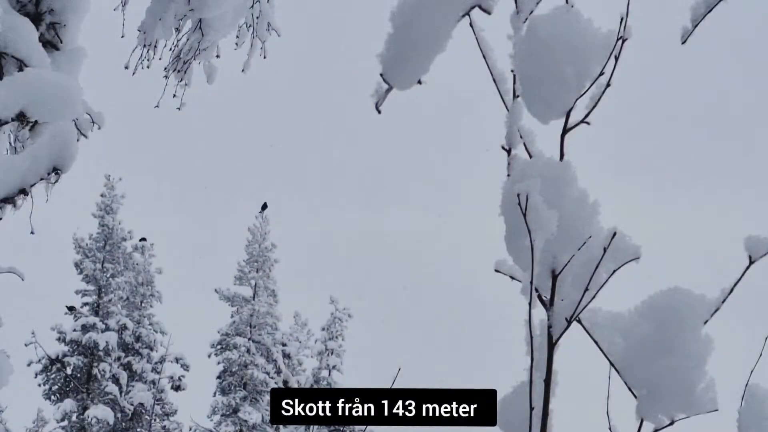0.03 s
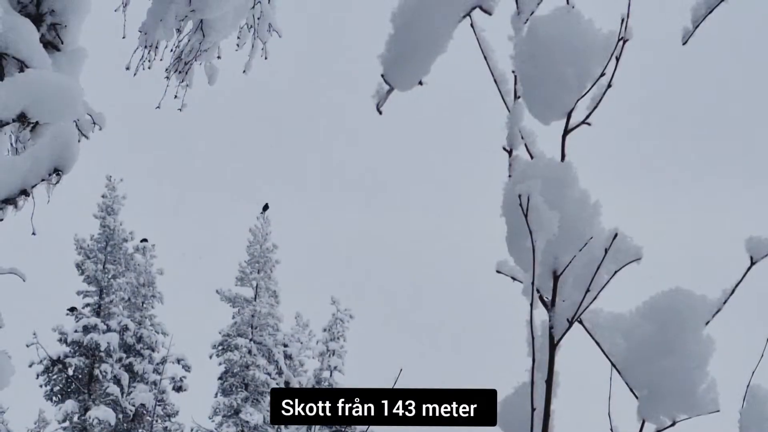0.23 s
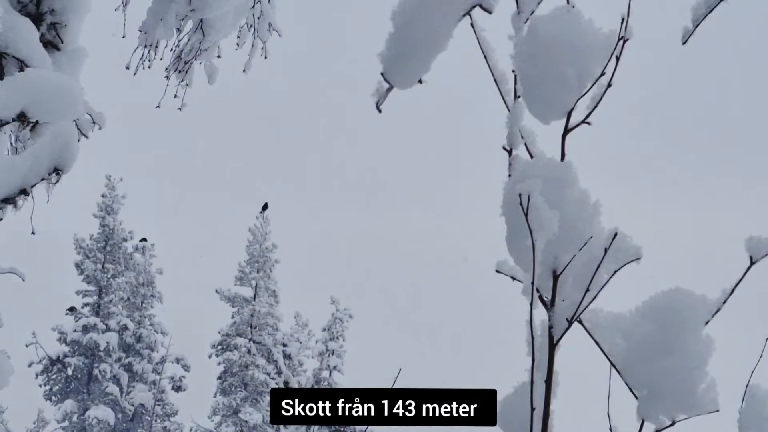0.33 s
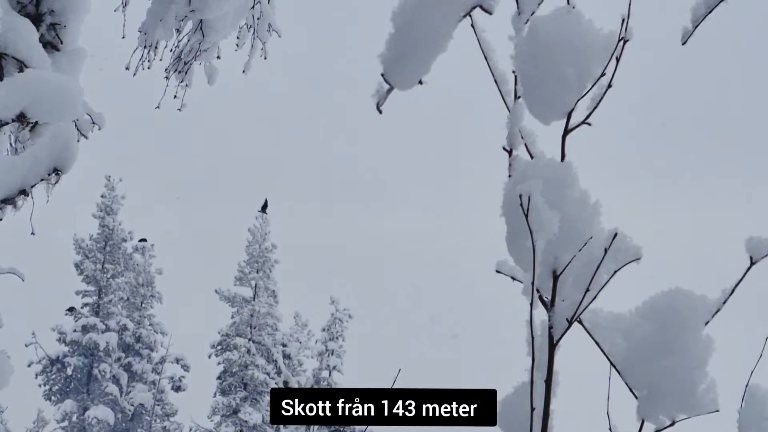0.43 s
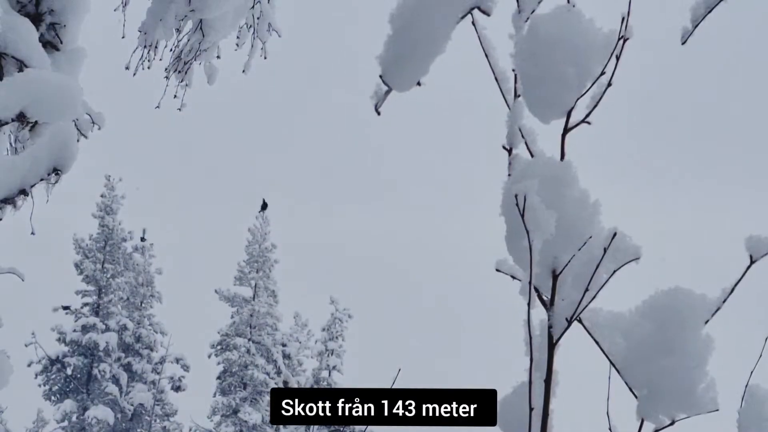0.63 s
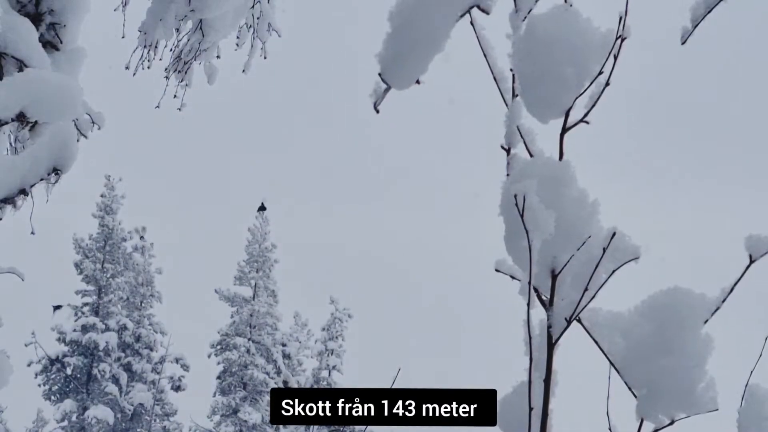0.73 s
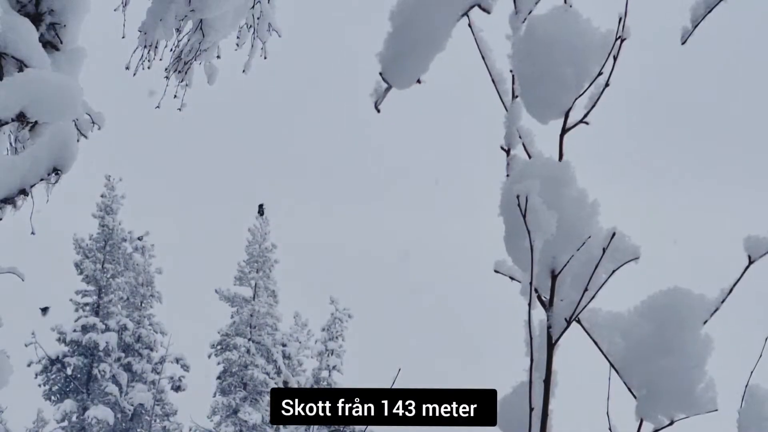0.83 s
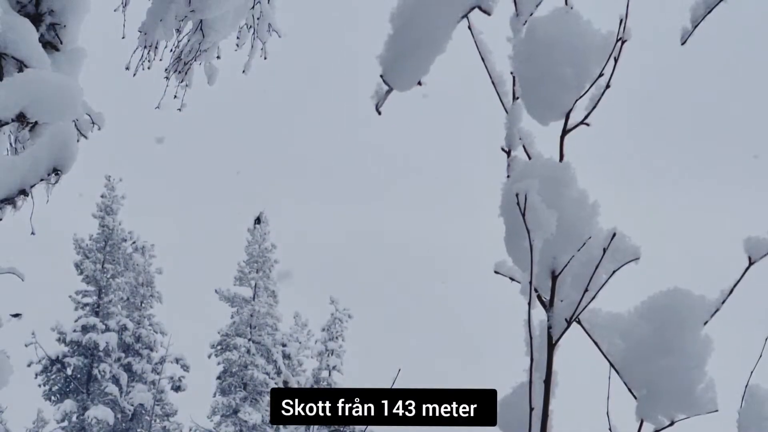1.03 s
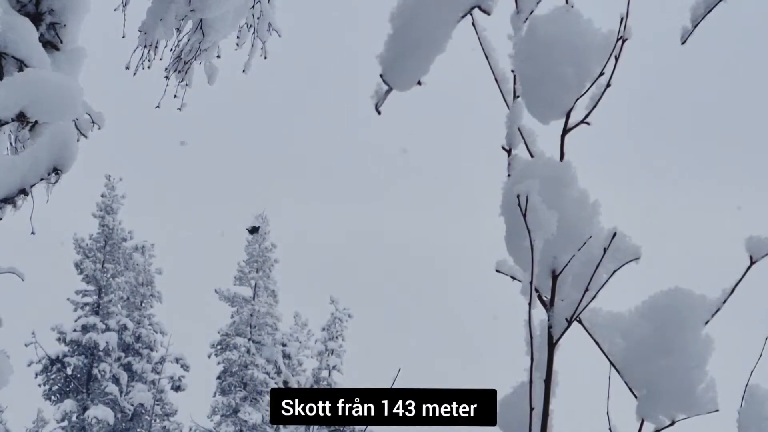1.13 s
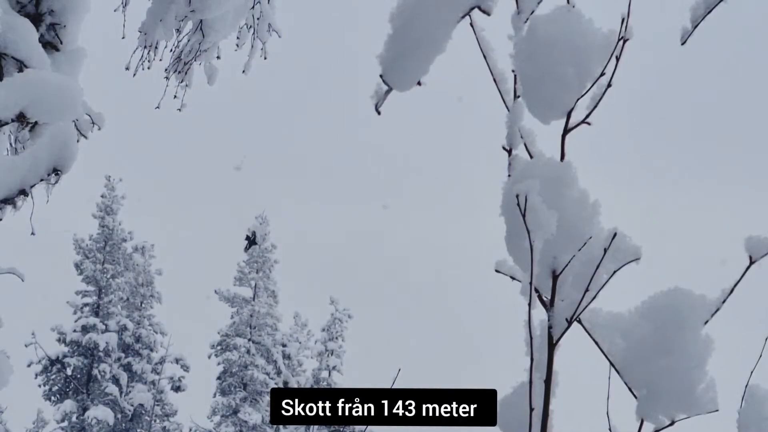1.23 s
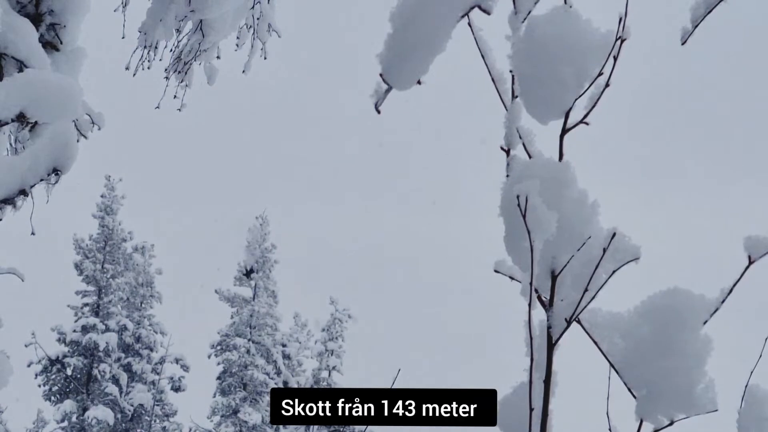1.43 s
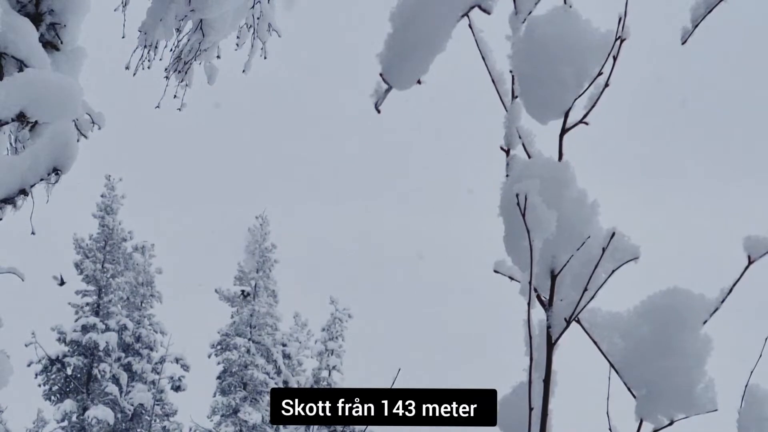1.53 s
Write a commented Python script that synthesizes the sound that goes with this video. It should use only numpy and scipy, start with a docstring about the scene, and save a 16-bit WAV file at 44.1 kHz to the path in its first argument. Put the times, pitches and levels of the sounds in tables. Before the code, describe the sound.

One loud rifle crack outdoors, then a duller distant report echoing among the trees.

```python
"""A rifle bullet cracks past close by in a snowy forest: sharp shock fronts inside a low thump,
which the nearest trees scatter as a bright hiss. The dull report of the distant muzzle follows,
then ever darker echoes: grainy clouds from stands of trees, snaps from single trunks.
Twigs crackle, and underneath lie the forest's afterglow, faint air, rumble and one soft bump."""
import sys
import numpy as np
from scipy.fft import rfft, irfft, next_fast_len
from scipy.io import wavfile

SR = 44100
rng = np.random.default_rng(int(sys.argv[2]) if len(sys.argv) > 2 else 0)


def output_pcm(signal):
    """Save a mono or channel-first signal as 16-bit PCM at the path in sys.argv[1].

    Samples are clipped to [-1, 1] before scaling.
    """
    pcm = np.clip(np.atleast_2d(signal).T, -1, 1) * 32767
    wavfile.write(sys.argv[1], SR, np.round(pcm).astype(np.int16))


N = 70560

REPORT_S = .6727  # the muzzle's sound arrives
# Tone of the shot scattered by near trees (frequency [Hz], level [dB])
NEAR_COLOUR = [(60, -24), (200, -17), (400, -7), (900, -1), (3000, 1), (4300, -4), (6000, -2), (9000, -16),
               (12500, -13), (16000, -20)]
# Echoes from stands of trees
# (time [s], level [dB], rise [s], hold [s], fall [s], tilt [dB/octave], low cut [Hz])
STANDS = [(.674, -40, .01, .018, .08, 3.5, 350), (.694, -35, .012, .005, .06, .5, 350),
          (.715, -35, .03, .019, .09, 1, 350), (.743, -34.7, .04, .017, .07, -.3, 400),
          (.878, -55, .015, .012, .12, .5, 600), (.921, -53, .02, .006, .05, -4, 1400),
          (.962, -57.5, .02, .018, .15, .5, 900), (1.029, -39.5, .08, .013, .13, -.4, 600),
          (1.052, -47.5, .03, .01, .15, -2.5, 550), (1.104, -51, .05, .007, .12, -.5, 1100),
          (1.168, -55, .02, .006, .16, -2, 1400), (1.276, -46.5, .02, .035, .16, -1.8, 350),
          (1.337, -46.7, .05, .025, .5, -2.8, 350), (1.551, -47.5, .08, .033, .2, -5, 600)]


def bullet():
    """The bullet passes: shock fronts inside a wash of crack, boom, narrow tones and scatter."""
    fade_in = np.clip((clock() - .204) / .009, 0, 1)
    return shock_fronts() + (crack() + boom() + narrow_tones() + near_trees()) * fade_in


def shock_fronts(corner_hz=4500):
    """The bullet's N-shaped pressure jumps, their edges softened by a low-pass."""
    # Shock fronts (time [s], level [dB], length [s])
    shocks = [(.2366, -9, .0006), (.2375, -7, .0004), (.2384, -9, .0014), (.2461, -7, .0012)]
    t = clock()
    fronts = sum(-amp(db) * 2 * (t - s) / length * (abs(t - s) < length / 2) for s, db, length in shocks)
    return filtered(fronts, 1 / (1 + 1j * bins() / corner_hz)) * pan(-2)


def crack():
    """A hard, short burst of noise around the shock fronts."""
    # Envelope (time [s], level [dB], rise [s], hold [s], fall [s], pan [dB])
    stage = (.2365, -14.8, .065, .003, .06, -1.2)
    # Tone (frequency [Hz], level [dB])
    tone = [(30, -25), (240, -12), (370, -3), (480, -12), (660, 3), (850, -7), (1250, -1), (1550, -7),
            (2900, -1), (3800, -8), (4700, -6), (6800, -20), (11000, -14), (16000, -26)]
    return burst(stage, tone, diffuse=.9, grain_db=1.5)


def boom(swing_s=.2364, width_s=.0018, note_hz=48):
    """One swing of pressure, up then down, and a deep note that lingers after it."""
    # Envelope of the note (time [s], level [dB], rise [s], hold [s], fall [s], pan [dB])
    stage = (.2335, -27.5, .06, .018, .15, -5)
    t = clock()
    u = (t - swing_s) / width_s
    swing = -amp(-18) * u * np.exp((1 - u ** 2) / 2)
    note = swell(*stage[:-1]) * np.cos(2 * np.pi * note_hz * (t - stage[0]))
    return (swing + note) * pan(stage[-1])


def narrow_tones(centres_hz=(4690, 5860), width_hz=75):
    """Two faint, narrow bands of high noise, near 4.7 and 5.9 kHz, sound briefly."""
    # Envelope (time [s], level [dB], rise [s], hold [s], fall [s], pan [dB])
    stage = (.236, -29.5, .08, .014, .1, -6)
    bands = sum(1 / (1 + (2 * (bins() - hz) / width_hz) ** 2) for hz in centres_hz)
    return swell(*stage[:-1]) * pan(stage[-1]) * noise(bands, diffuse=.8)


def near_trees():
    """The nearest trees scatter the crack: a bright hiss, a second wave, a light and a low tail."""
    # Envelopes (time [s], level [dB], rise [s], hold [s], fall [s], pan [dB])
    hiss = (.247, -16, .05, .007, .22, -4.5)
    scatter = (.286, -20.6, .12, .025, .145, -1.5)
    tail = (.35, -44, .3, .02, .7, -1)
    low_tail = (.3, -35, .12, .025, .28, 0)
    # Tones (frequency [Hz], level [dB])
    hiss_tone = [(30, -25), (200, -7), (550, -7), (750, -2), (1250, -2), (1600, -10), (4000, -10),
                 (5900, -1), (7200, -7), (9200, -8), (12300, 2), (16000, -2)]
    scatter_tone = [(50, -14), (200, -12), (550, -8), (720, 0), (1150, -2), (2050, -11), (2750, -2),
                    (4250, -17), (4800, 0), (5400, -2), (5900, 1), (6800, -3), (8800, -13), (12300, -5),
                    (16000, -14)]
    low_tone = [(60, -24), (170, -6), (480, -5), (800, 2), (2000, -16), (6000, -48)]
    return (burst(hiss, hiss_tone, diffuse=.85, grain_db=1)
            + burst(scatter, scatter_tone, diffuse=.85, grain_db=1.2)
            + burst(tail, NEAR_COLOUR, diffuse=.9, grain_db=2.5)
            + burst(low_tail, low_tone, diffuse=.7, grain_db=1.5))


def report():
    """The distant muzzle: a dull knock and its bright scatter."""
    # Envelope of the scatter (time [s], level [dB], rise [s], hold [s], fall [s], pan [dB])
    stage = (.672, -46, .006, .06, .42, -2)
    knock = push(REPORT_S, db=-25.5, hz=720, width_s=.00078)
    return knock + burst(stage, NEAR_COLOUR, diffuse=.7, grain_db=2)


def stands():
    """Each stand of trees returns a grainy cloud; thin trees return no bass."""
    clouds = 0
    for s, db, rise, hold, fall, tilt, cut in STANDS:
        response = echo_colour(s, tilt) * low_cut(cut) * bearing(s)
        clouds += swell(s, db, rise, hold, fall) * noise(response, diffuse=.27, grain_db=3)
    return clouds


def trunks(rattle_fall_s=.035):
    """Each trunk returns a snap, and its branches a brief rattle."""
    # Echoes from single trunks (time [s], level [dB], tilt [dB/octave])
    echoes = [(.449, -32, 4), (.501, -33, 2), (.513, -35, 2), (.587, -36, -1.5), (.6966, -23, 0),
              (.7000, -16, 0), (.7163, -21, 2), (.7421, -12, -.7), (.7533, -20, -1), (1.0365, -27, 0),
              (1.066, -31, -2.5), (1.1025, -30.5, 2), (1.169, -40, -2), (1.252, -39, 0), (1.2755, -33, -2),
              (1.293, -31, 0), (1.341, -34, -3), (1.568, -36, -3)]
    spectrum, t = 0, clock()[:SR // 20]
    for s, db, tilt in echoes:
        *_, cut = min(STANDS, key=lambda stand: abs(stand[0] - s))  # low cut of the stand nearest in time
        rattle = rng.standard_normal(len(t)) * amp(-60 * t / rattle_fall_s)
        branches = amp(-6) * rfft(rattle / np.linalg.norm(rattle), padded())
        snap = echo_colour(s, tilt) * low_cut(cut)
        delay = np.exp(-2j * np.pi * bins() * s)
        spectrum -= amp(db) * snap / snap.mean() * (1 + branches) * bearing(s) * delay
    return irfft(spectrum)[:, :N]


def twigs(snaps_per_s=900):
    """Twigs scatter swells of tiny bright snaps."""
    # Swells (time [s], level [dB], rise [s], hold [s], fall [s], tilt [dB/octave], low cut [Hz])
    swells = [(.39, -56, .1, .04, .3, 8, 6000), (1.283, -61.5, .03, .03, .2, 3, 3000)]
    crackle = 0
    for s, *shape, tilt, cut in swells:
        snaps = (rng.random(N) < snaps_per_s / SR) * rng.standard_normal((2, N))
        crackle += swell(s, *shape) * unit(filtered(snaps, echo_colour(s, tilt) * low_cut(cut)))
    return crackle


def echo_colour(s, tilt_db, air_db_per_khz_s=4.5):
    """Echoes from near trees keep their treble; later ones have crossed more air and are darker."""
    # Tone of far echoes (frequency [Hz], level [dB])
    far_colour = [(60, -42), (220, -29), (380, -19), (550, -10), (850, -8), (1200, 0), (1650, 0),
                  (2200, -6), (3000, -9), (4000, -19), (5200, -16), (7500, -33), (16000, -52)]
    base = colour(NEAR_COLOUR if s < REPORT_S else far_colour)
    air_loss_db = air_db_per_khz_s * max(s - REPORT_S, 0) * bins() / 1000
    octaves = np.log2(np.maximum(bins(), 300) / 1000)
    return base * amp(tilt_db * octaves - air_loss_db)


def bearing(s, centred_until_s=1.02, drift_ms_per_s=.6):
    """Late echoes come from ever further right, so they reach the right ear first."""
    lead_ms = drift_ms_per_s * max(s - centred_until_s, 0)
    right = np.exp(1j * np.pi * bins() * lead_ms / 1000)
    return np.array([right.conj(), right])


def afterglow():
    """The forest's soft, slowly fading reverberation."""
    # Envelope (time [s], level [dB], rise [s], hold [s], fall [s], pan [dB])
    stage = (.8, -64, .3, .2, 4.5, -1.5)
    # Tone (frequency [Hz], level [dB])
    tone = [(60, -25), (200, -13), (330, -2), (700, -10), (1500, 0), (2600, -8), (5500, -23), (9000, -44)]
    return burst(stage, tone, diffuse=.8, grain_db=2.5)


def background():
    """A bed of faint air and low rumble, with one soft bump."""
    # Tones (frequency [Hz], level [dB])
    air_tone = [(100, 0), (1800, -2), (6500, -13), (9000, -22), (12000, -15), (16000, -20)]
    rumble_tone = [(20, -4), (55, 0), (100, -6), (200, -16), (600, -45)]
    air = amp(-72) * noise(colour(air_tone), diffuse=.7)
    rumble = amp(-77.5) * noise(colour(rumble_tone), diffuse=.3)
    bump = push(.972, db=-59, hz=108, width_s=.011)
    return air + rumble + bump


def burst(stage, tone, diffuse, grain_db):
    """A panned swell of coloured noise."""
    return swell(*stage[:-1]) * pan(stage[-1]) * noise(colour(tone), diffuse, grain_db)


def swell(s, db, rise, hold, fall):
    """An envelope that peaks at time s and holds; rise and fall are seconds per 60 dB."""
    t = clock() - s
    return amp(db - 60 * (np.maximum(-t, 0) / rise + np.maximum(t - hold, 0) / fall))


def push(s, db, hz, width_s):
    """A pressure pulse of a few cycles under a bell curve."""
    t = clock() - s
    return -amp(db) * np.exp(-(t / width_s) ** 2 / 2) * np.cos(2 * np.pi * hz * t)


def noise(response, diffuse, grain_db=0, grain_hz=600):
    """Grainy stereo noise of rms 1; the diffuse share differs between the sides."""
    centre = np.sqrt(1 - diffuse) * rng.standard_normal(N)
    sides = np.sqrt(diffuse) * rng.standard_normal((2, N))
    grain = np.interp(clock() * grain_hz, np.arange(N), rng.standard_normal(N))
    return unit(filtered((centre + sides) * amp(grain_db * grain), response * ripple()))


def ripple(depth_db=2.7, spacing_hz=150):
    """Random peaks and notches where paths of unequal length interfere."""
    return amp(depth_db * np.interp(bins() / spacing_hz, np.arange(SR), rng.standard_normal(SR)))


def colour(points):
    """An EQ curve through (Hz, dB) points on a log axis."""
    hz, db = np.transpose(points)
    return amp(np.interp(np.log(bins() + 1), np.log(hz + 1), db))


def low_cut(hz):
    """A steep high-pass curve."""
    return 1 / np.sqrt(1 + (hz / (bins() + 1)) ** 8)


def filtered(x, response):
    """Apply a frequency response."""
    return irfft(rfft(x, padded()) * response)[..., :N]


def pan(db):
    """Stereo gains for a level difference, left minus right."""
    return amp(np.array([[db], [-db]]) / 2)


def amp(db):
    """Decibels to gain."""
    return 10 ** (np.asarray(db) / 20)


def unit(x):
    """Scale to rms 1."""
    return x / np.sqrt(np.mean(x ** 2) + 1e-20)


def clock():
    """The time of each sample."""
    return np.arange(N) / SR


def bins():
    """The frequency of each FFT bin."""
    return np.fft.rfftfreq(padded(), 1 / SR)


def padded():
    """FFT length, with room for filter tails."""
    return 2 * next_fast_len(N // 2 + 2048)


def scene():
    """The shot, its echoes and the forest's afterglow over the quiet background."""
    glow = afterglow()
    return bullet() + (report() + stands() + trunks() + twigs()) * pan(-1.2) + glow + background()


def record(dry, ceiling=.8, top_hz=16100):
    """Soft clipping rounds the highest peaks, and a steep low-pass trims the very top."""
    rounded = dry / (1 + (dry / ceiling) ** 6) ** (1 / 6)
    return filtered(rounded, 1 / (1 + (bins() / top_hz) ** 200))


dry = scene()
out = record(dry)
output_pcm(out)
```